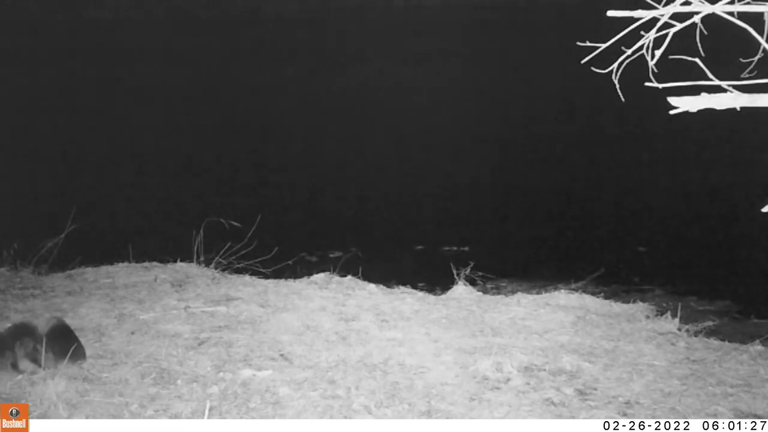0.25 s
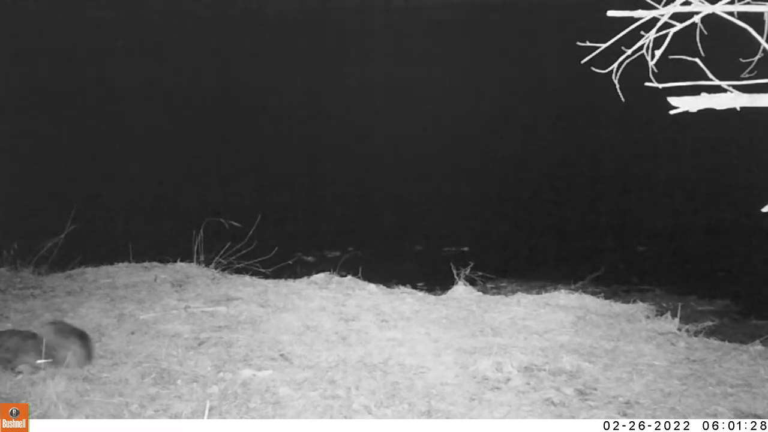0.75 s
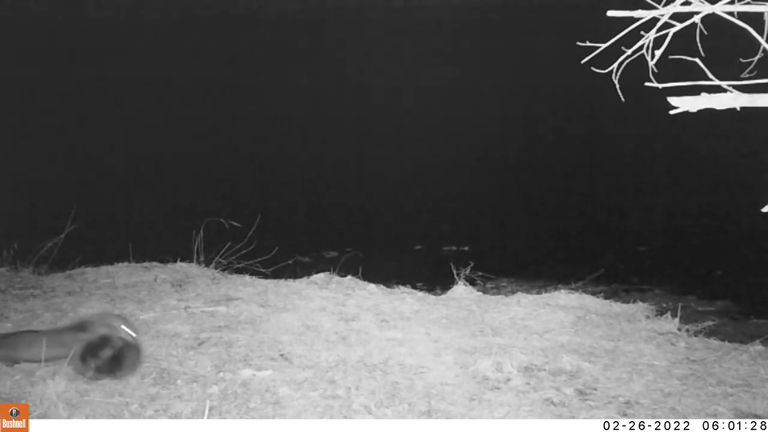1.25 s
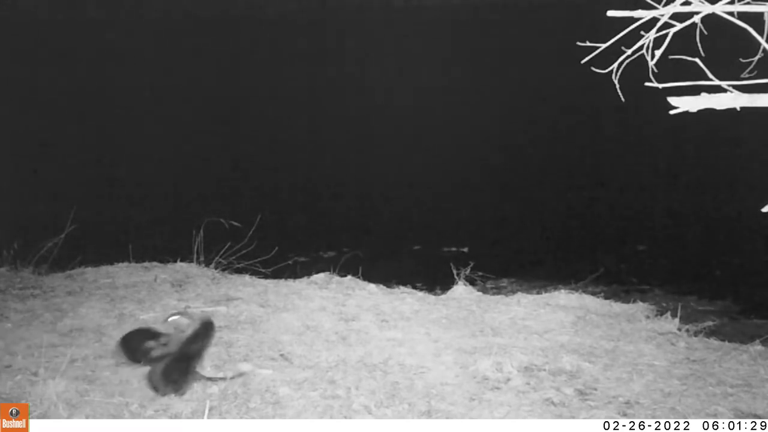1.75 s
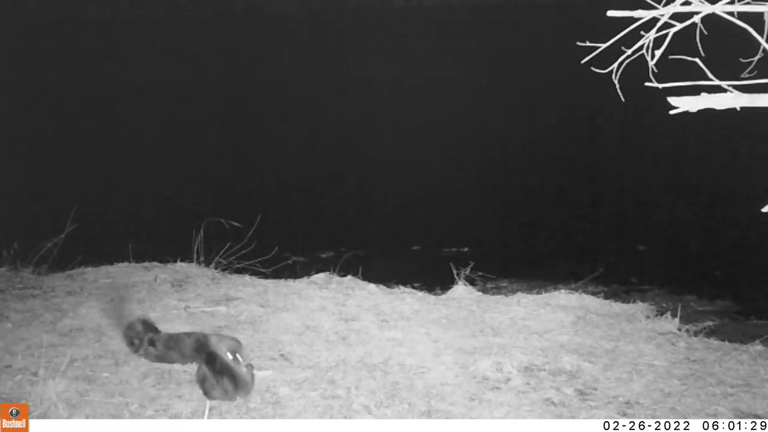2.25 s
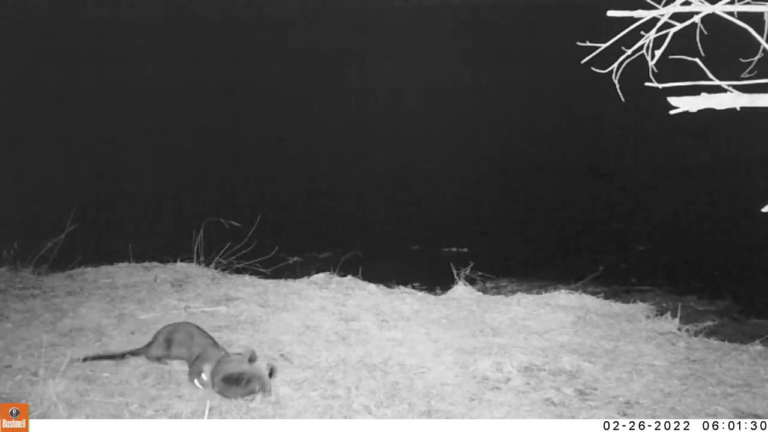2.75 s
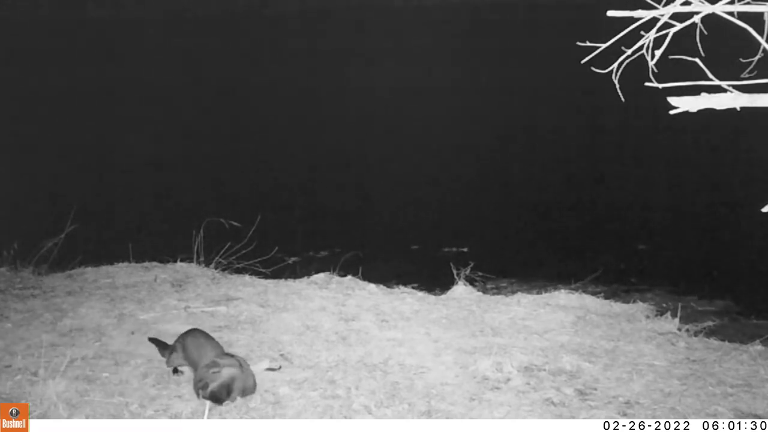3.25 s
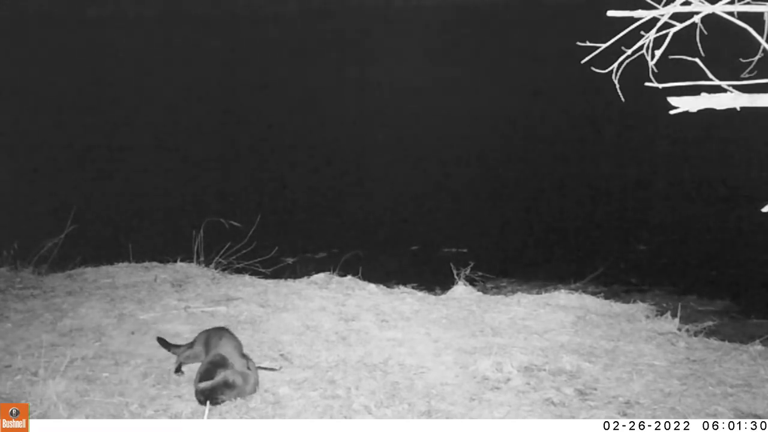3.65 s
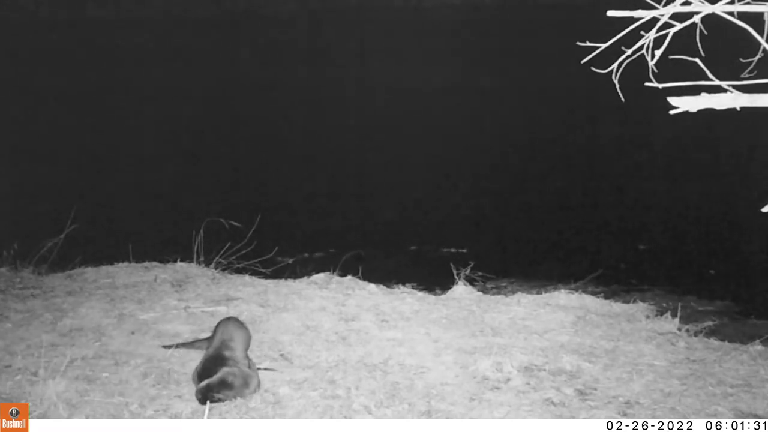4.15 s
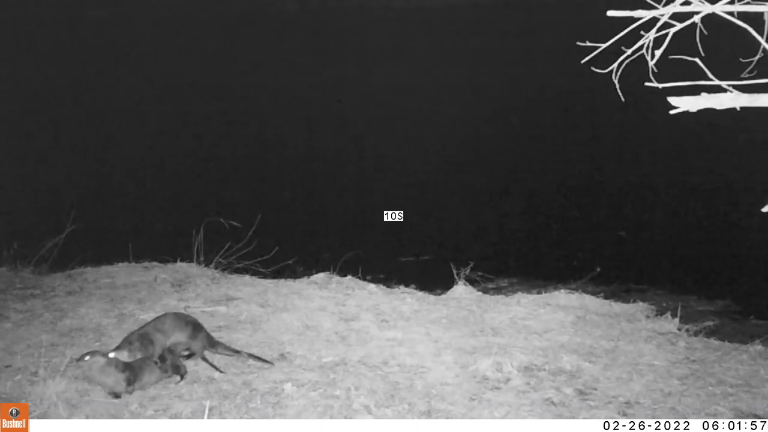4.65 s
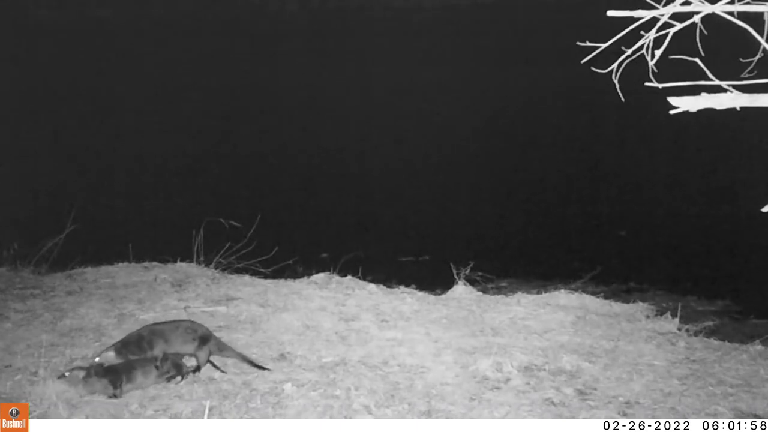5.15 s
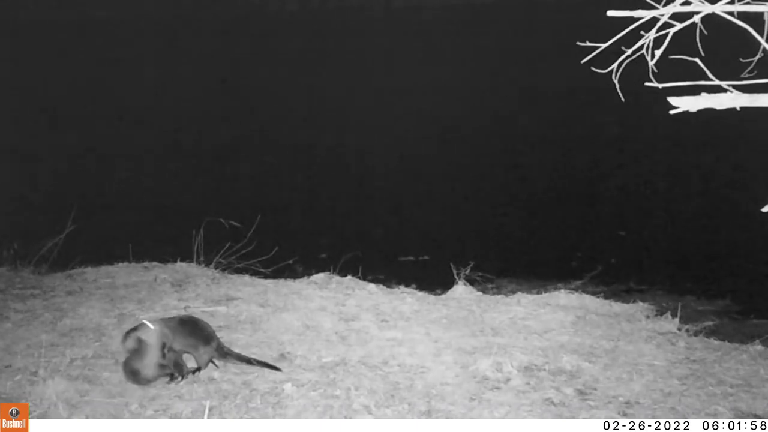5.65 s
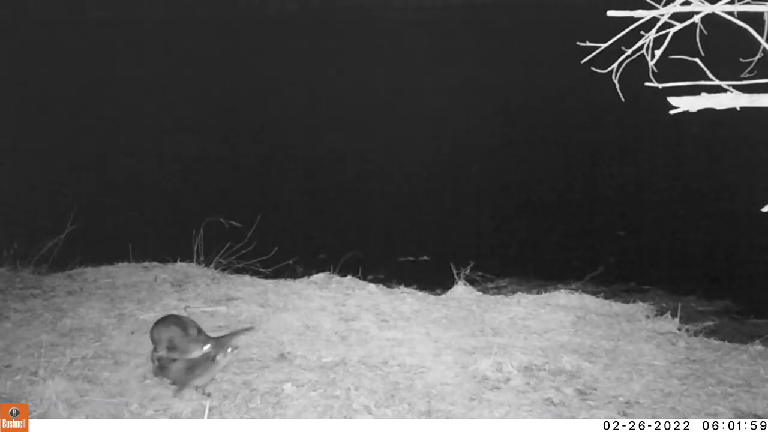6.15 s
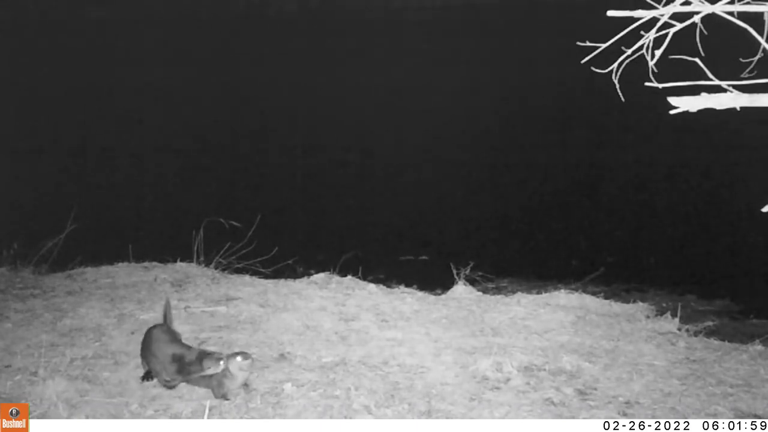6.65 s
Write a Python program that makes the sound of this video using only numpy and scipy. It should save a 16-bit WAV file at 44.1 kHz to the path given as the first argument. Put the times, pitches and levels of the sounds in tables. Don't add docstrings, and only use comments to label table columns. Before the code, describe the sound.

Two otters tussle on a night riverbank, panting in quick raspy chatter that flips into squeaks, with a brief hush before closer, louder calls.

```python
import sys
import numpy as np
from scipy import signal
from scipy.io import wavfile
from scipy.ndimage import uniform_filter1d, minimum_filter1d

SR = 44100
rng = np.random.default_rng(int(sys.argv[2]) if len(sys.argv) > 2 else 0)


def to_wav(s):
    ch = np.atleast_2d(s).T
    pcm = np.round(np.clip(ch, -1, 1) * 32767)
    wavfile.write(sys.argv[1], SR, pcm.astype(np.int16))


def volts_from_decibels(level):
    exponent = np.asarray(level, float) / 20
    return 10 ** exponent


N = 304290
T = np.arange(N) / SR

# pitch_hz, level_db per Hz
NIGHT_COLOUR = [(12, -41.5), (20, 5.5), (58, -4), (135, -11), (208, -15.5), (350, -21), (412, -23.5),
                (692, -27.5), (2630, -42.5), (4070, -41), (5060, -45), (6650, -43), (13500, -50.5)]
# time_s, level_db
SCENE_CHANGE = [(4.542, 0), (4.543, -32), (4.574, -27), (4.575, -22), (4.7, -23), (4.9, -25), (5.104, -24),
                (5.11, 0)]

# start_s, top_s, end_s, level_db
BODY_THUMPS = [
    (.45, .58, 1.1, -68),
    (1.0, 1.064, 1.21, -64),
    (1.25, 1.58, 1.7, -65.5),
    (3.58, 3.7, 3.86, -62.5),
    (4.3, 4.5, 4.543, -66.5),
]

# start_s, top_s, end_s, level_db
GRASS_SCUFFLES = [
    (.17, .32, .42, -73.5),
    (.54, .58, .67, -73),
    (1.1, 1.22, 1.36, -58.5),
    (2.0, 2.05, 2.31, -63),
    (2.5, 2.71, 2.838, -60),
    (3.64, 3.77, 3.79, -62),
]
# pitch_hz, level_db per Hz
GRASS_COLOUR = [(590, -41), (1000, -15), (2750, -8), (4160, -7), (5030, -18.5), (6530, -4.5), (8220, -20.5),
                (11000, -24), (14300, -47), (22000, -120)]
# time_s, peak_db
STEM_SNAPS = [
    (0.2648, -54),
    (0.3192, -56),
    (0.3386, -48),
    (0.4539, -51.5),
    (0.88, -50),
    (1.1456, -30),
    (2.5616, -62),
    (5.223, -60),
]

# time_s, peak_db
FOLD_CATCHES = [
    (3.276, -48),
    (3.412, -57),
    (4.183, -61),
    (5.421, -56),
]
# start_s, end_s, level_db
BARE_CREAKS = [
    (1.05, 2.03, -59),
    (1.374, 1.434, -48),
    (1.64, 1.69, -52),
    (1.89, 1.94, -54),
    (5.51, 6.9, -57),
    (5.51, 6.48, -50.5),
]

# start_s, top_s, end_s, effort_db, mouth_hz
OPENING_PANTS = [
    (0.0, 0.014, 0.062, -53.1, 3020),
    (0.096, 0.133, 0.17, -47.5, 2860),
    (0.674, 0.716, 0.75, -50.5, 3400.0),
    (0.805, 0.837, 0.89, -57.5, 3770),
    (0.935, 0.957, 1.028, -53.3, 2940),
    (1.045, 1.077, 1.18, -52.5, 3870.0),
]
# start_s, top_s, end_s, effort_db, mouth_hz
RUNNING_CHATTER = [
    (1.153, 1.222, 1.257, -36.5, 3700),
    (1.288, 1.349, 1.395, -39.5, 3730),
    (1.43, 1.436, 1.496, -37, 3930),
    (1.436, 1.498, 1.54, -40, 3900),
    (1.556, 1.598, 1.657, -34.5, 2970),
    (1.686, 1.7, 1.806, -43.5, 3370),
    (1.808, 1.826, 1.923, -43, 3522),
    (1.898, 1.98, 2.03, -43.3, 3300),
]
# start_s, top_s, end_s, effort_db, mouth_hz
LONE_PANTS = [
    (2.305, 2.334, 2.367, -43, 3150.0),
    (2.434, 2.458, 2.5, -45.5, 3664),
    (3.17, 3.183, 3.233, -44.5, 3580.0),
    (3.292, 3.329, 3.351, -40.5, 2882),
    (3.418, 3.45, 3.487, -51.5, 3360.0),
    (3.545, 3.582, 3.623, -51.5, 3180.0),
    (4.07, 4.087, 4.119, -53.5, 2857),
    (4.203, 4.222, 4.275, -47.5, 3120.0),
    (4.318, 4.34, 4.411, -49.5, 2888),
    (4.433, 4.504, 4.555, -57.9, 3580.0),
]
# start_s, top_s, end_s, effort_db, mouth_hz
FADING_PANTS = [
    (4.57, 4.585, 4.65, -69, 2830),
    (4.635, 4.68, 4.702, -71.5, 2760),
    (4.7, 4.72, 4.76, -82, 2650),
    (4.72, 4.799, 5.01, -85.5, 2600),
]
# start_s, top_s, end_s, effort_db, mouth_hz
CLOSE_PANTS = [(5.317, 5.346, 5.39, -36.0, 3080.0), (5.432, 5.462, 5.533, -34.5, 3697),
               (5.532, 5.587, 5.72, -38.2, 3600.0), (5.691, 5.739, 5.75, -31.5, 4200.0),
               (5.798, 5.853, 5.915, -30.5, 4000.0), (5.943, 5.985, 6.066, -33.5, 4050.0),
               (6.058, 6.15, 6.26, -40.5, 3403), (6.217, 6.298, 6.4, -39, 3550.0),
               (6.334, 6.438, 6.509, -40.4, 3470), (6.51, 6.581, 6.61, -39.0, 3150.0),
               (6.611, 6.73, 6.77, -35.6, 3410), (6.787, 6.829, 6.86, -36.5, 3600.0)]
BOUTS = [OPENING_PANTS, RUNNING_CHATTER, LONE_PANTS, FADING_PANTS, CLOSE_PANTS]
# rise_db, fall_db, bluntness (1-4)
BOUT_MANNER = [(18, 18, 2.0), (18, 18, 1.5), (18, 18, 2.5), (12, 12, 3.0), (18, 18, 2.5)]
BREATH_SHARE = [.25, .3, .17, .06, .13]

# time_s, level_db against effort
NOSE_FAR = [(0.02, -12.5), (0.13, -17.2), (0.7, -1.5), (0.85, -7), (1.08, -0.2), (1.2, -13), (1.35, -9.5),
            (1.44, -3.5), (1.6, -3.6), (1.72, -7), (1.98, -0.5), (2.46, -4), (3.19, -11), (3.45, -0.6),
            (3.58, -6.5), (4.09, -6.3), (4.22, -20), (4.5, -4.4)]
# time_s, level_db against effort
NOSE_CLOSE = [(4.65, -7), (4.76, -21), (5.35, -12.5), (5.48, -2.5), (5.6, -8), (5.73, -12), (5.85, -1.5),
              (5.98, 2), (6.15, -17), (6.43, -12), (6.58, -7.5), (6.72, -2), (6.83, -5.5)]
# time_s, level_db against effort
THROAT_OPENING = [(.72, -11), (.85, -1), (1.08, -9), (1.2, -24), (1.33, -12.5), (1.52, -26.5), (1.62, -25),
                  (1.83, -9.5), (3.2, -8), (3.32, -30), (3.45, -13), (4.09, -4.5), (4.23, -19), (4.5, -7),
                  (4.62, -27), (5.5, -21), (5.66, -13.5), (6.0, -18.5)]

# start_s, top_s, end_s, top_hz, end_hz
CLEAR_SQUEAKS = [(2.313, 2.327, 2.348, 1560, 1260), (3.172, 3.184, 3.203, 1820, 1350),
                 (5.317, 5.344, 5.365, 1540, 800), (5.572, 5.594, 5.645, 1930, 980),
                 (5.695, 5.726, 5.772, 2180, 1120), (5.824, 5.846, 5.9, 2320, 950),
                 (5.957, 5.99, 6.04, 2180, 1050), (6.11, 6.131, 6.203, 1750, 800),
                 (6.245, 6.276, 6.34, 1860, 800), (6.385, 6.417, 6.485, 1740, 750),
                 (6.542, 6.561, 6.61, 1580, 980), (6.81, 6.832, 6.86, 1420, 880)]
# start_s, top_s, end_s, top_hz, tone share (0-1)
HALF_SQUEAKS = [(.83, .845, .872, 1750, .3), (1.085, 1.1, 1.135, 1400, .35), (1.18, 1.212, 1.25, 1680, .45),
                (1.312, 1.336, 1.378, 1710, .45), (1.452, 1.47, 1.5, 1550, .2),
                (1.72, 1.735, 1.765, 1450, .25), (1.83, 1.845, 1.888, 1500, .35),
                (1.935, 1.975, 2.024, 1720, .35), (4.073, 4.085, 4.113, 1300, .35),
                (5.452, 5.47, 5.498, 1590, .6), (6.655, 6.688, 6.74, 1420, .6)]
# pitch_hz, level_db
SQUEAK_TONE_COLOUR = [(800, -26.5), (1500, -17.5), (2150, -4.5), (3000, -2.5), (4200, 3.5), (5400, -14),
                      (6600, 2), (8300, -23.5), (10500, -57)]

# pitch_hz, depth_db
TREBLE_DEPTH = [(7000, 70), (8200, 35), (10500, 33), (13500, 30.5)]


def evened(x):
    return x / np.sqrt(np.mean(x ** 2) + 1e-20)


def read(points, hz):
    f, value = np.transpose(points)
    return np.interp(np.log(hz + 1), np.log(f + 1), value)


def wander(size):
    return evened(uniform_filter1d(uniform_filter1d(rng.standard_normal(N), size), size))


def resonate(x, hz, width_hz):
    turn = np.exp(2j * np.pi * np.cumsum(hz * np.ones(len(x))) / SR)
    r = np.exp(-np.pi * width_hz / SR)
    low = x / turn
    for _ in range(3):
        low = signal.lfilter([1 - r], [1, -r], low)
    return 2 * (turn * low).real


def coloured(points, patchy_db):
    frames, hz = N // 256 + 5, np.fft.rfftfreq(1024, 1 / SR)
    a, b, patches = rng.standard_normal((frames, 513, 3)).T
    patches = evened(uniform_filter1d(uniform_filter1d(patches, 12, 0), 10, 1))
    spectrum = (a + 1j * b) * volts_from_decibels(read(points, hz)[:, None] + patchy_db * patches)
    return evened(signal.istft(spectrum, nperseg=1024, noverlap=768)[1][:N])


def swell(start, top, end, rise_db, fall_db, blunt):
    inside = slice(round(start * SR), round(end * SR))
    t = T[inside]
    rising = np.maximum((top - t) / (top - start), 0)
    falling = np.maximum((t - top) / (end - top), 0)
    under_db = -rise_db * rising ** blunt - fall_db * falling ** blunt
    return inside, under_db, (t - start) / (end - start)


def swells(rows, rise_db, fall_db, blunt):
    level_db = np.full(N, -120.)
    for start, top, end, db in rows:
        inside, under_db, _ = swell(start, top, end, rise_db, fall_db, blunt)
        level_db[inside] = np.maximum(level_db[inside], db + under_db)
    return level_db


def clicks(rows):
    out = np.zeros(N)
    for s, db in rows:
        out[round(s * SR)] = volts_from_decibels(db)
    return out


def night():
    level_db = -55 + np.interp(T, *np.transpose(SCENE_CHANGE))
    return volts_from_decibels(level_db) * coloured(NIGHT_COLOUR, patchy_db=1.16)


def thumps():
    lumps = resonate(rng.standard_normal(N) * volts_from_decibels(3.9 * wander(size=500)), hz=550, width_hz=700)
    level = uniform_filter1d(volts_from_decibels(swells(BODY_THUMPS, rise_db=6, fall_db=8, blunt=1.4)), 400)
    return level * evened(lumps)


def grass():
    grains = volts_from_decibels(1.53 * wander(size=50) + 2.0 * wander(size=600))
    level = volts_from_decibels(swells(GRASS_SCUFFLES, rise_db=12, fall_db=12.5, blunt=1.44))
    rustle = level * evened(coloured(GRASS_COLOUR, patchy_db=4.0) * grains)
    t = T[:200]
    stem_ring = np.sin(2 * np.pi * 6700 * t) * (t / 0.00032) * np.exp(1 - t / 0.00021)
    return rustle + signal.oaconvolve(clicks(STEM_SNAPS), stem_ring)[:N]


def catches():
    t = T[:300]
    mouth_ring = np.sin(2 * np.pi * 2900 * t) * (t / 0.0012) * np.exp(1 - t / 0.001)
    return signal.oaconvolve(clicks(FOLD_CATCHES), mouth_ring)[:N]


def panting():
    mouth_rest_hz, mouth_sag_hz_per_db = 3090., 15.5
    effort_db, hoarse, progress = np.full(N, -120.), np.full(N, .05), np.zeros(N)
    mouth_hz = np.full(N, mouth_rest_hz)
    for start, end, db in BARE_CREAKS:
        effort_db[(T > start) & (T < end)] = db
    for rows, (rise_db, fall_db, blunt), breath in zip(BOUTS, BOUT_MANNER, BREATH_SHARE):
        for start, top, end, db, hz in rows:
            inside, under_db, along = swell(start, top, end, rise_db, fall_db, blunt)
            leads = db + under_db > effort_db[inside]
            for curve, value in [(effort_db, db + under_db),
                                 (mouth_hz, hz + mouth_sag_hz_per_db * under_db),
                                 (hoarse, breath), (progress, along)]:
                curve[inside] = np.where(leads, value, curve[inside])
    nose_db = np.interp(T, *np.transpose(NOSE_FAR + NOSE_CLOSE))
    nose_db = nose_db - 6 * uniform_filter1d(progress, 300)
    gape_db = np.interp(T, *np.transpose(THROAT_OPENING))
    return effort_db, mouth_hz, nose_db, gape_db, hoarse


def creak(effort_db, mouth_hz, nose_db, gape_db, hoarse, share):
    hoarse = np.maximum(hoarse, .75 * share ** 3)
    slack_db = effort_db + minimum_filter1d(-effort_db, 8000)
    rate_hz = 290 * np.clip(1 + .015 * slack_db, .6, 1)
    turns = np.cumsum(rate_hz * (1 + .07 * wander(size=1500) + .07 * wander(size=90))) / SR
    snaps = np.diff(np.floor(turns), prepend=0) * volts_from_decibels(1.6 * wander(size=60))

    puffs = evened((0.54 + np.exp(-(turns % 1) / 0.52)) * rng.standard_normal(N))
    spurts = signal.oaconvolve(snaps, np.hanning(80), "same") * rng.standard_normal(N)
    snaps = evened(snaps)
    voiced, breathy = np.sqrt(1 - hoarse), np.sqrt(hoarse)
    drive = voiced * snaps + breathy * puffs
    jet = voiced * evened(.8 * snaps + evened(spurts)) + breathy * puffs

    mouth_hz = uniform_filter1d(mouth_hz, 300) * (1 + 0.047 * wander(size=200))
    nose_hz = 6700 * (1 + .025 * wander(size=3000))
    mouth = evened(resonate(drive, mouth_hz, width_hz=940))
    cheek = evened(resonate(jet, 1.33 * mouth_hz, width_hz=1000))
    palate = evened(resonate(jet, 0.737 * mouth_hz, width_hz=680))
    throat = evened(resonate(jet, 1567, width_hz=1100))
    nose = evened(resonate(jet + .4 * puffs, nose_hz, width_hz=1600))
    air = evened(resonate(jet, 9270, width_hz=2200))

    sides = volts_from_decibels(-4 + 0.25 * gape_db) * (volts_from_decibels(1.0) * cheek + volts_from_decibels(-1.0) * palate)
    body = mouth + sides + volts_from_decibels(gape_db) * (1 - 0.36 * share) * throat
    body = body - 0.5 * signal.lfilter(*signal.iirpeak(2050, 4.0, SR), body)
    return body + volts_from_decibels(nose_db) * (nose + volts_from_decibels(-7.5) * hoarse * air)


def arches():
    clear = [(*row, .91) for row in CLEAR_SQUEAKS]
    half = [(start, top, end, hz, (1 - .38) * hz, purity) for start, top, end, hz, purity in HALF_SQUEAKS]
    return clear + half


def squeak(nose_db):
    tone, share, tremble = np.zeros(N), np.zeros(N), wander(size=40)
    flicker_db = [2.2 * wander(size=350) + min(k, 3) * wander(size=70) for k in range(8)]
    for start, top, end, top_hz, end_hz, purity in arches():
        inside = (T >= start) & (T < end)
        t = T[inside]
        rise = .7 * (top_hz - end_hz) * ((top - t) / (top - start)) ** 2
        fall = (top_hz - end_hz) * ((t - top) / (end - top)) ** 2
        hz = top_hz - np.where(t < top, rise, fall)
        hz = hz * (1 + (1.08 - purity) * .055 * tremble[inside])
        phase = 2 * np.pi * np.cumsum(hz) / SR

        roughness = .9 - purity
        wave, power = 0, 0
        for k in range(1, 9):
            level_db = read(SQUEAK_TONE_COLOUR, k * hz) - (4 + 7 * roughness) * max(k - 2, 0)
            level_db = level_db + np.clip((k * hz - 4800) / 900, 0, 1) * .7 * (nose_db[inside] + 6)
            level_db = level_db + flicker_db[k - 1][inside]
            if k == 1 and start < SCENE_CHANGE[0][0]:
                level_db = level_db + 7 * roughness
            gain = volts_from_decibels(level_db)
            wave = wave + gain * np.cos(k * phase)
            power = power + gain ** 2 / 2
        tone[inside] = wave / np.sqrt(power)
        share[inside] = purity * signal.windows.tukey(len(t), .4)
    return tone * volts_from_decibels(1.73 * wander(size=150)), share


def otter():
    effort_db, mouth_hz, nose_db, gape_db, hoarse = panting()
    tone, share = squeak(nose_db)
    rough = volts_from_decibels(-1.0) * creak(effort_db, mouth_hz, nose_db, gape_db, hoarse, share)
    mixed = (1 - 0.95 * share) * rough + np.sqrt(share) * tone
    voice = uniform_filter1d(volts_from_decibels(effort_db), 60) * mixed
    t = T[:6000]
    tail = rng.standard_normal(6000) * volts_from_decibels(-60 * t / .09) * (t > .003)
    return voice + volts_from_decibels(-17) * signal.fftconvolve(voice, tail / np.linalg.norm(tail))[:N]


def scene():
    return (night() + thumps() + grass() + catches() + otter())[None]


def thin_treble(x):
    hz, _, z = signal.stft(x, SR, nperseg=1024, noverlap=768)
    power = abs(z) ** 2 + 1e-20
    middle = power[(hz > 2000) & (hz < 7500)].mean(0)
    middle_db = 10 * np.log10(uniform_filter1d(middle, 9))
    band_db = 10 * np.log10(uniform_filter1d(uniform_filter1d(power, 20, 0), 4, 1))
    chance = rng.standard_normal((len(middle_db) // 4 + 1, 33))
    chance_db = 0.96 * np.repeat(np.repeat(chance, 4, 0), 16, 1).T
    need_db = middle_db - read(TREBLE_DEPTH, hz)[:, None] + chance_db[:len(hz), :len(middle_db)]
    return signal.istft(z * (band_db > need_db), SR, nperseg=1024, noverlap=768)[1][:N]


def top_cut(x):
    return signal.sosfilt(signal.butter(12, 13870, fs=SR, output="sos"), x)


def record(dry):
    mix = thin_treble(dry[0])[None]
    return top_cut(mix)


dry = scene()
out = record(dry)
to_wav(out)
```